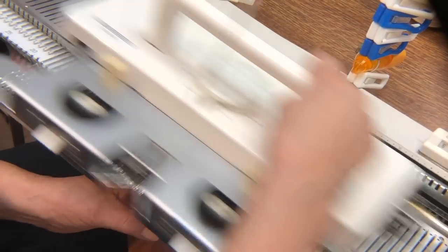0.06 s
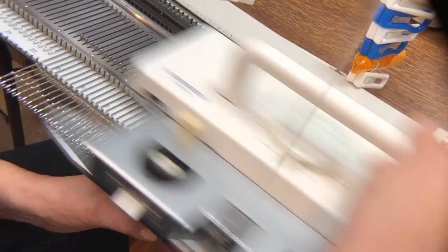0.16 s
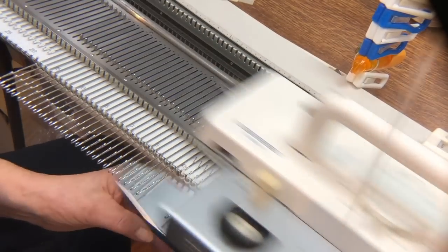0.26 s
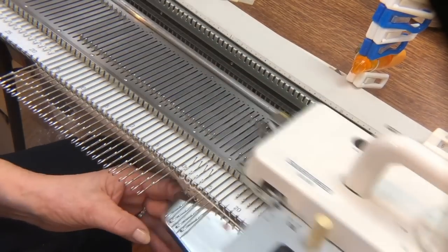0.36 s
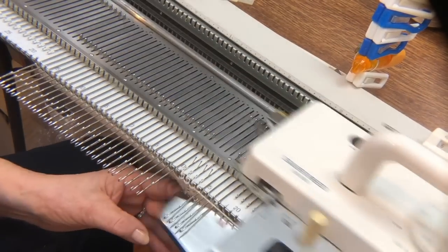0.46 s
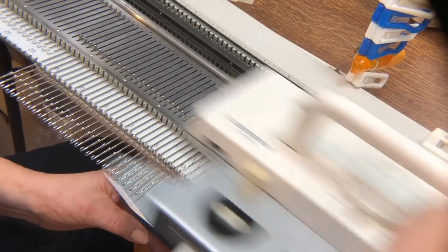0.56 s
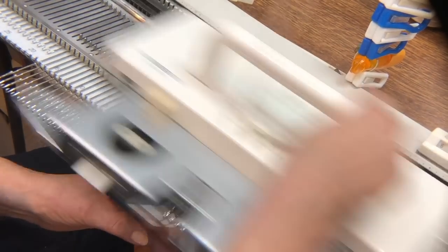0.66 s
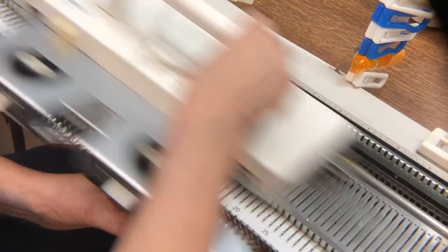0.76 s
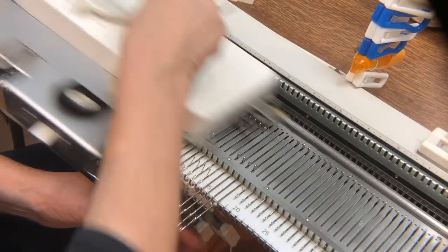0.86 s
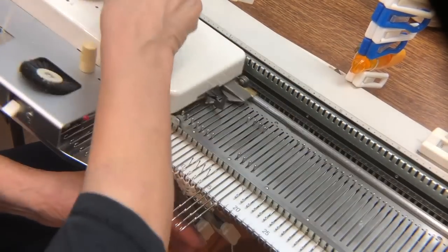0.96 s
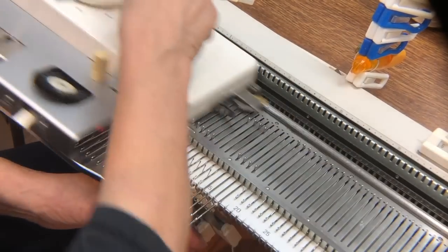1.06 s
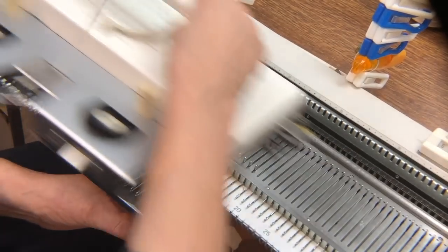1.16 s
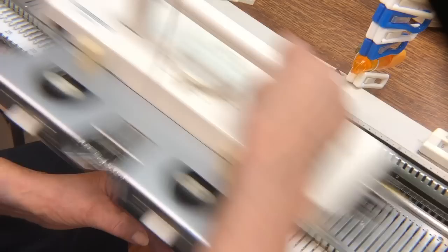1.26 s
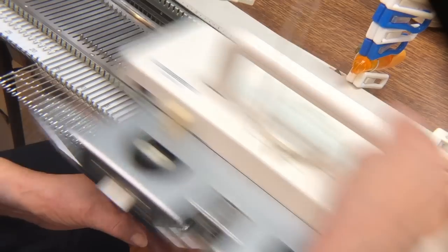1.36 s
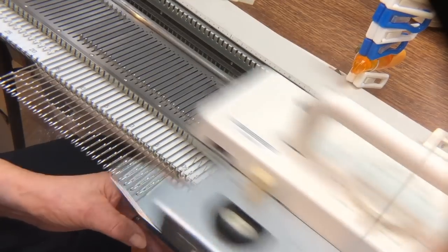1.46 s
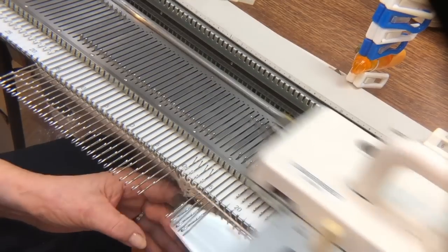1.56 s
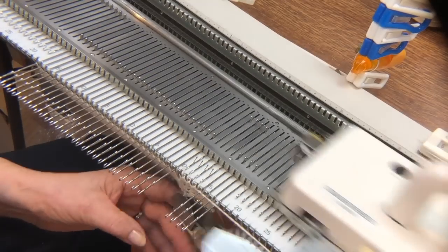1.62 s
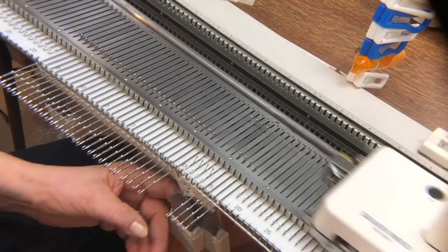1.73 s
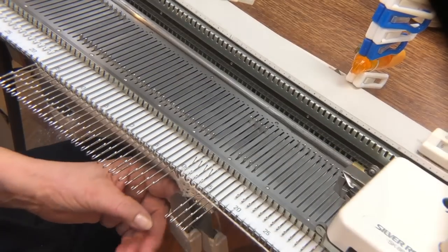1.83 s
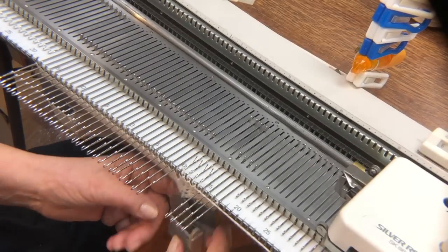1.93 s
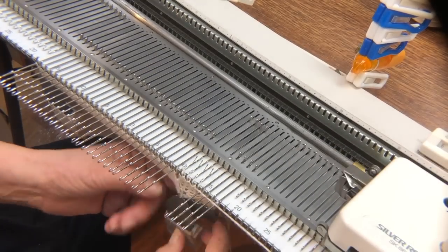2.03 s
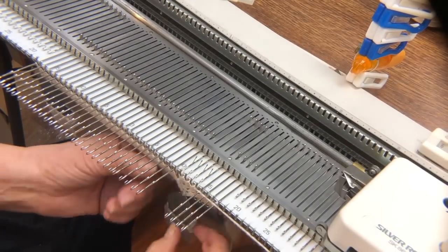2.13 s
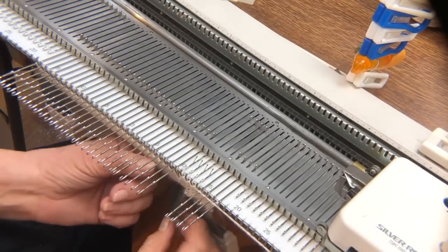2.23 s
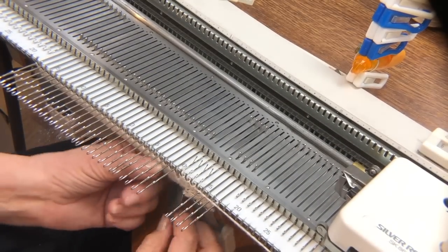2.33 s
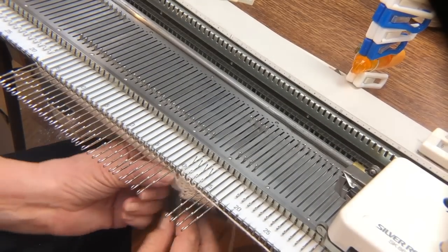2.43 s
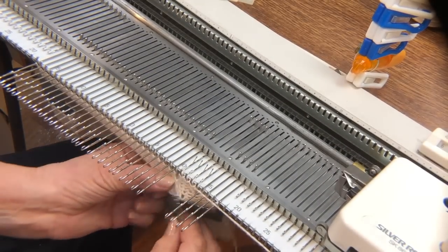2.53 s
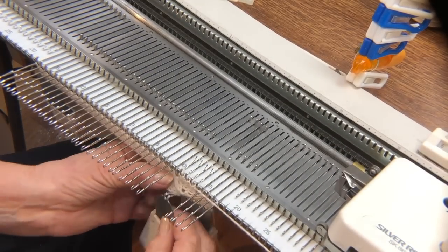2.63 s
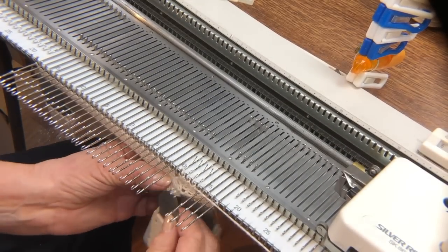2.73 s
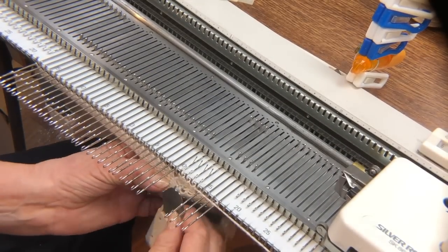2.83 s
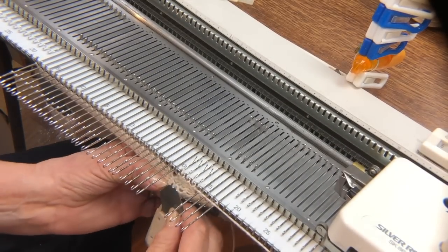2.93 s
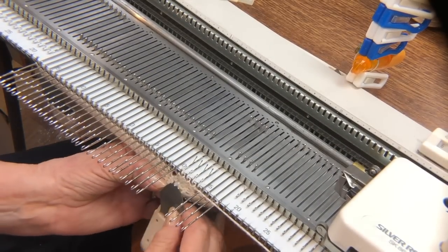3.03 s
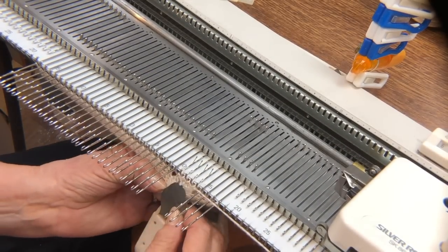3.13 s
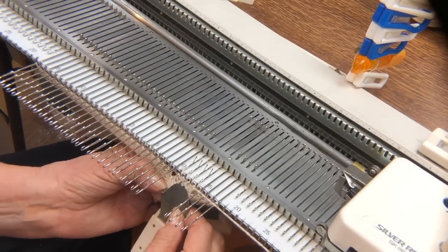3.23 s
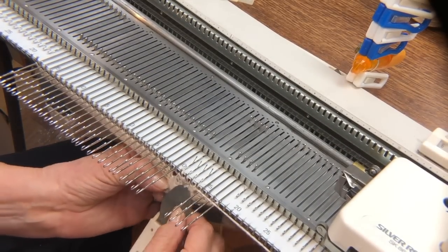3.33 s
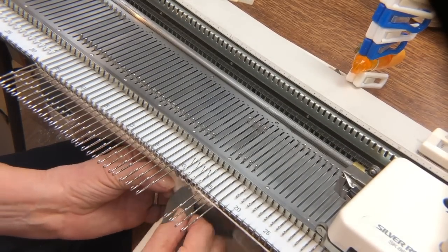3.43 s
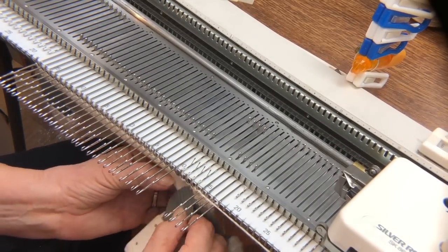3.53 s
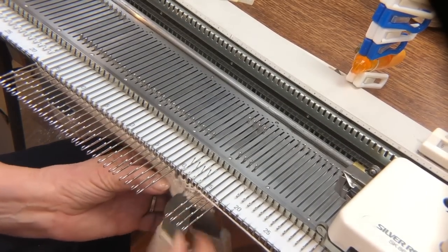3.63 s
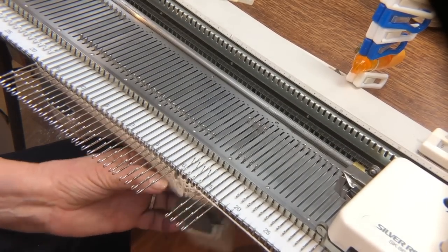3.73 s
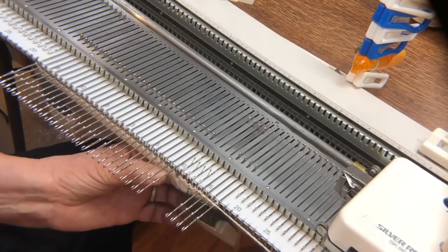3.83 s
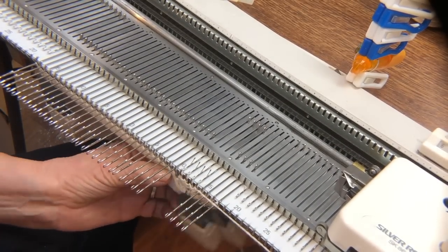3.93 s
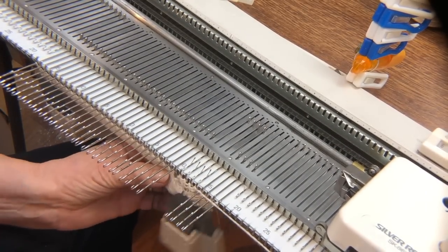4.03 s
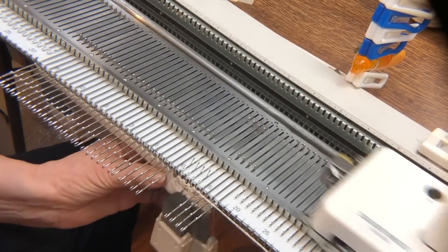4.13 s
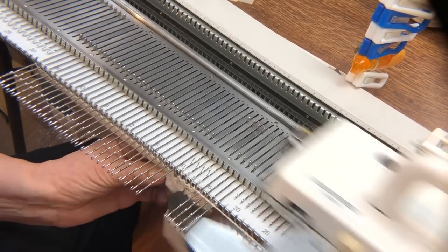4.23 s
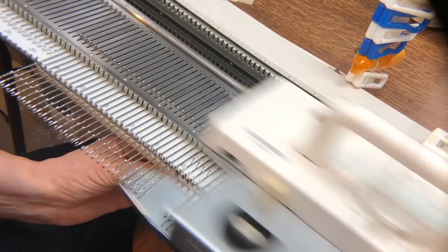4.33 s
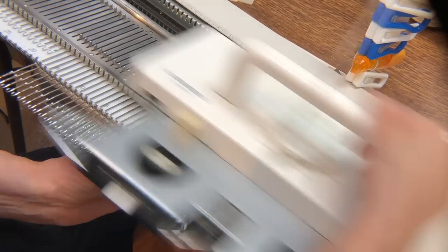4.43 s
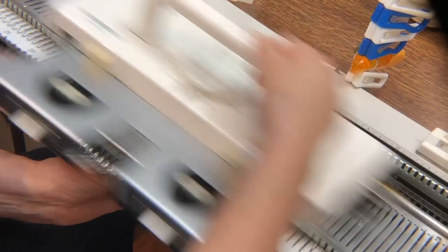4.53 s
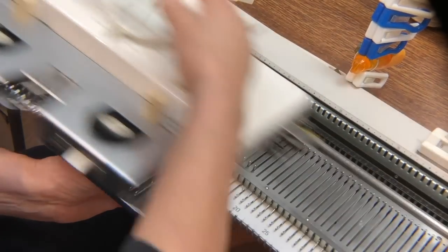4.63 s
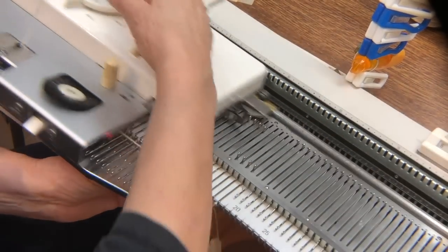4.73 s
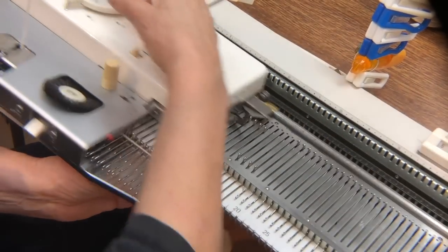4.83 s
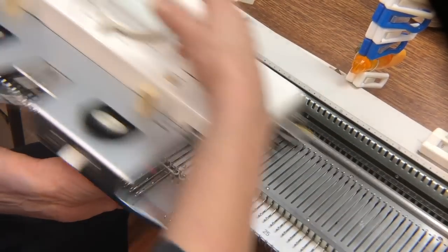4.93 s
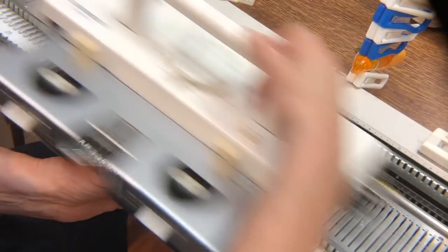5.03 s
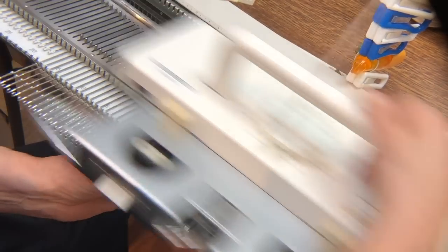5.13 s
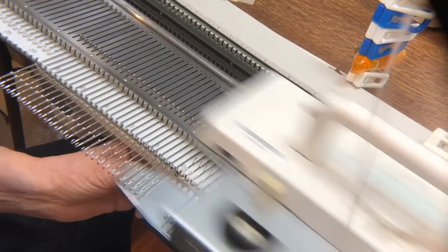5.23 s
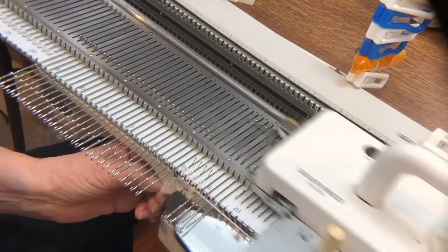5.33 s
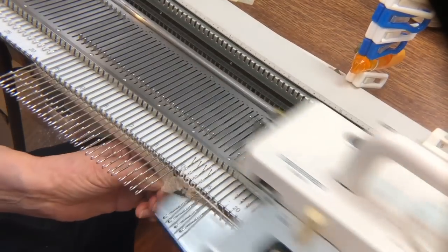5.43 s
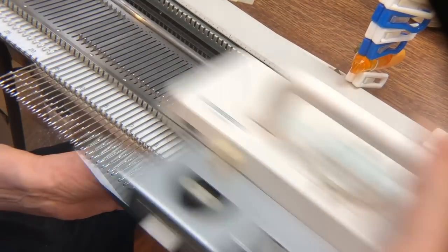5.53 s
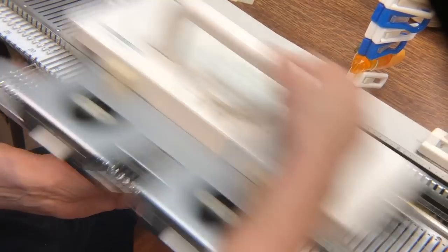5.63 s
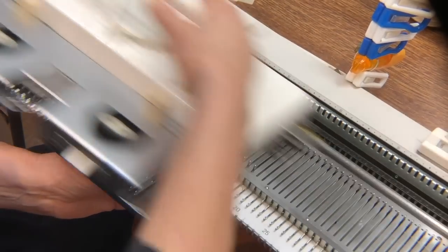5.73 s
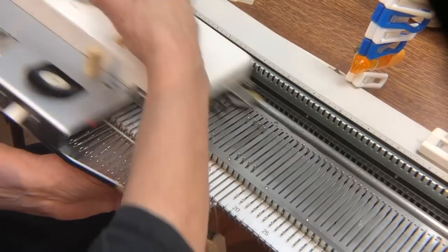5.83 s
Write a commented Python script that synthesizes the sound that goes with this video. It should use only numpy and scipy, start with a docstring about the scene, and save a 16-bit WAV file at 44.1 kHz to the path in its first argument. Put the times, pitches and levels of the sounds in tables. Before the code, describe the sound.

A hand knitting machine heard by one close microphone, centred, with short room reflections. Bright needle clatter over low rail rumble swells and fades with each push, snapping and clacking as cams enter or leave the working needles. After three strokes comes a quiet pause with faint fabric rubs, a dull knock, tiny ticks and ringing steel, then three further strokes.

```python
"""Knitting machine carriage and claw weight

A carriage is pushed over the needle bed, three rows, a pause, then three more, in a small room. Struck
needle butts rattle as grain-driven noise; rail and table rumble through resonances; sprung cams snap as
short rings. In the pause, hands rehang a steel claw weight: rubbing grains, noise ticks, rasping yarn and
a beating cluster of plate modes. One close microphone feeds both channels."""
import sys
import numpy as np
from scipy import signal
from scipy.fft import rfft, irfft
from scipy.io import wavfile

SR = 44100
rng = np.random.default_rng(int(sys.argv[2]) if len(sys.argv) > 2 else 0)


def digitize_waveform(pressure):
    """Quantize a signal to 16-bit integers and store it at the path in sys.argv[1].

    Rows of a 2-D input are taken as channels; values are limited to [-1, 1].
    """
    field = np.atleast_2d(pressure).T
    bounded = np.clip(field, -1, 1)
    quanta = np.round(bounded * 32767).astype(np.int16)
    wavfile.write(sys.argv[1], SR, quanta)


N = 258796
TIME = np.arange(N) / SR

# spectrum of the struck needles: pitch_hz [Hz], level_db [dB per Hz, relative]
NEEDLE_SPECTRUM = [(700, -35.5), (1400, -7.5), (1800, -2), (2550, -9), (2800, -7), (4400, -7), (5600, -1.5),
                   (7300, -1), (9300, -2), (11400, -4.5), (12700, -8), (14000, -2.5), (15800, -7.5)]
# resonances of the needles: centre_hz [Hz], width_hz [Hz], lift_db [dB]
NEEDLE_RESONANCES = [(1686, 96, 0), (2290, 380, 3.5), (2427, 150, 8), (6280, 670, 5), (6380, 550, 2),
                     (7870, 500, 4), (8980, 130, 4), (11190, 480, 3.5)]
# resonances of the needle bed: centre_hz [Hz], width_hz [Hz], lift_db [dB]
BED_RESONANCES = [(141.6, 14, 8.9), (300.9, 23, 11.4), (649, 30, 6.5), (1010, 11, 4.7), (1080, 44, 1.8)]


def undb(db):
    """Decibels to gain."""
    return 10 ** (np.asarray(db) / 20)


def unit(x):
    """Scale to rms 1."""
    return x / np.sqrt(np.mean(x ** 2))


def colour(x, points, peaks=(), size=8192):
    """Causal minimum-phase filter: a smooth spectrum with resonances on top."""
    f = np.maximum(np.arange(size // 2 + 1) * SR / size, 1)
    hz, db = np.transpose(points)
    shape = np.interp(np.log(f), np.log(hz), db)
    for centre, width, lift in peaks:
        shape = shape + lift / (1 + (2 * (f - centre) / width) ** 2)
    # folding the cepstrum forward in time makes the filter causal
    cepstrum = irfft(np.log(undb(shape)))
    cepstrum[1:size // 2] *= 2
    cepstrum[size // 2 + 1:] = 0
    impulse = irfft(np.exp(rfft(cepstrum)))
    return signal.fftconvolve(x, impulse)[:len(x)]


def lowpass(x, hz):
    """Gentle low-pass without delay."""
    sos = signal.butter(1, min(hz, .45 * SR), fs=SR, output="sos")
    return signal.sosfiltfilt(sos, x)


def fade(t60):
    """Half a second of exponential decay, falling 60 dB in t60 seconds."""
    return undb(-60 * TIME[:SR // 2] / t60)


def burst(t60):
    """A dense cloud of modes dying away, made of decaying noise."""
    return rng.standard_normal(SR // 2) * fade(t60)


def ring(hz, t60):
    """One decaying mode."""
    return np.sin(2 * np.pi * hz * TIME[:SR // 2]) * fade(t60)


def add(out, s, x, db):
    """Mix in a hit that starts at time s, scaled to the given peak level."""
    i = max(int(s * SR), 0)
    hit = x * undb(db) / np.abs(x).max()
    out[i:i + len(x)] += hit[:N - i]


def grains(rate, spread_db):
    """Tiny impacts of uneven size, rate a second, at even mean power."""
    chance = np.clip(rate / SR, 1e-3, 1)
    signs = rng.choice([-1, 1], N)
    sizes = signs * undb(spread_db * np.clip(rng.standard_normal(N), -2, 2))
    return unit((rng.random(N) < chance) * sizes / np.sqrt(chance))


def clatter(rate, spread_db, t60):
    """Tiny impacts, each exciting its own brief cloud of modes."""
    energy_decay = undb(-120 / (t60 * SR))
    energy = signal.lfilter([1], [1, -energy_decay], grains(rate, spread_db) ** 2)
    return unit(np.sqrt(energy) * rng.standard_normal(N))


def flutter(rate, depth_db):
    """A gain that wanders at random, with a new target rate times a second."""
    knots = rng.standard_normal(N // 20)
    return undb(depth_db * np.interp(TIME * rate, np.arange(len(knots)), knots))


def swell(s, rise_s, fall_s, shape=2):
    """A bell of height 1 at time s, with its own rise and fall times."""
    return np.exp(-np.abs((TIME - s) / np.where(TIME < s, rise_s, fall_s)) ** shape)


def lifts(rows, width_s):
    """A gain of 1 with a brief rise at each (s, dB)."""
    return undb(sum(db * swell(s, width_s, width_s) for s, db in rows))


def reverb(x, t60, wet_db):
    """Direct sound plus a diffuse tail, with the response held at unit energy."""
    tail = burst(t60)
    response = undb(wet_db) * tail / np.linalg.norm(tail)
    response[0] += 1
    # the lowest notes are left to the resonances of the machine
    bass = lowpass(x, 500)
    return bass + signal.fftconvolve(x - bass, response / np.linalg.norm(response))[:len(x)]


def room_tone():
    """The quiet room: steady coloured noise, with a faint thin whine."""
    # room noise spectrum: pitch_hz [Hz], level_db [dB per Hz, relative]
    room_spectrum = [(24, -31), (40, -1), (80, 1), (309, -2.5), (838, -12.5), (1250, -16.5), (1960, -17),
                     (2840, -22.5), (5580, -24), (6640, -15), (8110, -25), (14400, -29.5), (15500, -37)]
    hiss = colour(rng.standard_normal(N), room_spectrum, [(6530, 700, -1), (8950, 200, 8.0)])
    return unit(hiss) * undb(-72.5)


def push_strength():
    """Each push gathers speed and slows, the next takes over at the turn; also the rightward share, 0-1."""
    # pushes, right and left in turn: fastest_s [s], level_db [dB], speeding_up_s [s], slowing_down_s [s]
    push_rows = [(0.155, -24.5, .195, 0.27), (0.822, -21.5, 0.18, 0.15), (1.355, -23, 0.14, 0.34),
                 (4.645, -23.5, 0.32, 0.15), (5.164, -22.5, .15, 0.22), (5.76, -19.5, 0.16, 0.13)]
    push_shape = 2.17  # 2 is a plain bell; higher holds the speed longer and brakes harder
    park_s, restart_s, stopping_s = 1.87, 4.16, .04
    bells = np.array([undb(db) * swell(s, rise_s, fall_s, push_shape)
                      for s, db, rise_s, fall_s in push_rows])
    parked = (TIME > park_s) & (TIME < restart_s)
    moving = np.where(parked, swell(park_s, stopping_s, stopping_s), 1)
    # the carriage never slides quite evenly
    push = np.linalg.norm(bells, axis=0) * moving * flutter(22.04, depth_db=1.24)
    right = bells[::2].sum(axis=0) / (bells.sum(axis=0) + 1e-30)
    return push, right


def cam_load(lag_s):
    """1 while a cam is among the working needles: it bites at once and lets go gradually."""
    # the leading cam among the working needles: enter_s [s], leave_s [s]
    engaged_spans = [(-0.1, 0.32), (0.657, 1.497), (4.448, 5.295), (5.602, 5.975)]
    settle_s = 0.057  # the needles calm down after the cams have left
    t = TIME - lag_s
    loads = [(t >= enter) * np.exp(-np.maximum(t - leave, 0) / settle_s)
             for enter, leave in engaged_spans]
    return np.max(loads, axis=0)


def needles(drive, force):
    """Needle butts strike the cams: force makes the blows denser and brighter, drive sets their level."""
    blows = clatter(1100 + 2600 * force, spread_db=3.2, t60=.012)
    bright = unit(colour(blows, NEEDLE_SPECTRUM, NEEDLE_RESONANCES))
    # running clear of the working needles, the rattle is duller, fuller near 2 kHz
    soft_tilt = [(1200, -1.0), (2300, 4.5), (3000, 3.0), (7000, 0.5), (11000, -6.5), (13000, -12), (16000, -13)]
    soft = colour(bright, soft_tilt, [(6300, 600, -0.5), (7900, 700, 0)])
    rattle = force * bright + (1 - force) * soft * undb(0.5)
    return reverb(rattle * drive, t60=0.07, wet_db=-6) * undb(0.72)


def bed(grinding, rumble):
    """The carriage grinds along its rail and shakes the steel bed and the table under it."""
    # rail grinding spectrum: pitch_hz [Hz], level_db [dB per Hz, relative]
    rail_spectrum = [(100, -41.5), (260, -26), (420, -2.5), (560, 4), (800, 1), (1250, 1), (1700, -9.5),
                     (3000, -22), (8000, -49.5)]
    # table rumble spectrum: pitch_hz [Hz], level_db [dB per Hz, relative]
    table_spectrum = [(20, -51), (32, -31), (48, -17.5), (100, -5), (135, 0), (190, 3), (240, -5),
                      (340, -1), (450, -9), (900, -36.5)]
    scuffing = reverb(clatter(1200, spread_db=0.5, t60=0.029), t60=0.16, wet_db=-2.0)
    rail = unit(colour(scuffing, rail_spectrum, BED_RESONANCES))
    table = unit(colour(grains(1500, spread_db=2), table_spectrum, BED_RESONANCES))
    return rail * grinding + table * rumble


def carriage():
    """The pushes and the load on the cams drive the rattle, the grinding and the rumble."""
    # rattle surges midway through each push to the right: time_s [s], lift_db [dB]
    surge_rows = [(0.155, 3.5), (1.39, 3.5), (5.165, 2)]
    # resistance makes the carriage grind harder on its rail: time_s [s], lift_db [dB]
    drag_rows = [(0.105, 3.5), (0.364, 14.5), (0.716, 9.5), (1.345, 4), (1.574, 11), (4.505, 5),
                 (5.334, 11.5), (5.66, 6.5), (5.785, 0.5)]
    push, right = push_strength()
    # the trailing cam follows the leading one, which takes most of the load
    cam_gap_s, lead_share = .038, 0.87
    load = lead_share * cam_load(0) + (1 - lead_share) * cam_load(cam_gap_s)
    free = np.clip(1 - load, 0, 1)  # 1 when running clear of the working needles
    surge = lifts(surge_rows, width_s=.035)
    drive = push * undb(-13 * free) * surge
    # the hardest blows come at a push of -23 dB; a small share is left when running clear
    force = np.clip(push / undb(-23), 0, 1) ** 0.097 * 0.07 ** free
    # pushed to the right, the carriage shakes the machine more
    grind_db = -19.5 - 4 * free + 0.5 * right
    rumble_db = -36.5 - 5 * free + 2 * right
    # the exponents are dB per dB of push: the rumble grows more slowly with speed
    grinding = push ** .84 * undb(grind_db) * lifts(drag_rows, width_s=.019)
    rumble = push ** 0.47 * undb(rumble_db) * surge * flutter(13, depth_db=3.0)
    return needles(drive, force) + bed(grinding, rumble)


def snaps():
    """Each sprung cam snaps over with a ring of a few milliseconds and a short noise burst."""
    # cams snapping over: time_s [s], level_db [peak dB before reverb and trim], ring_hz [Hz]
    snap_rows = [(0.3136, -17, 6620), (0.3534, -9.5, 6500), (0.661, -14, 6600), (0.6975, -11, 6120),
                 (1.5224, -10.5, 6430), (1.5619, -11.5, 6720), (4.4508, -10, 6650), (4.4867, -12, 6100),
                 (5.2896, -15, 6600), (5.3233, -8.5, 6580), (5.6051, -5, 6720), (5.635, -9, 6080)]
    out = np.zeros(N)
    for s, db, hz in snap_rows:
        ping = ring(hz, t60=0.019) * (1 - fade(0.0017))
        add(out, s - .0007, ping + undb(-15.5) * burst(0.0058), db)
    return reverb(out, t60=0.26, wet_db=-3.0) * undb(-4.0)


def clacks():
    """The carriage jolts the rail and the whole row of needles answers."""
    # play taken up on the rail: time_s [s], level_db [peak dB before low-pass and trim]
    clack_rows = [(0.354, -7.5), (0.559, -38), (0.6583, -11), (1.1348, -28), (1.5617, -6.5), (4.146, -44),
                  (4.1634, -52), (4.292, -26), (4.3723, -17), (4.4479, -12.5), (4.9495, -20.5),
                  (5.3226, -10.5), (5.503, -34), (5.5995, -9)]
    out = np.zeros(N)
    for s, db in clack_rows:
        jolt = burst(0.0033) + undb(-10.0) * burst(0.22)
        add(out, s, colour(jolt, NEEDLE_SPECTRUM, NEEDLE_RESONANCES), db)
    return lowpass(out, hz=12300) * undb(-2.0)


def knocks():
    """Dull blows ring the bed, each spot with its own pitch; the loose needles shiver on after them."""
    # blows on the bed: time_s [s], level_db [peak dB before trim], bass_boost_db [dB], pitch_hz [Hz]
    knock_rows = [(0.359, -22.5, -1.5, 880), (0.698, -22.5, -15, 1300), (0.712, -39, -10, 750),
                  (1.567, -25.5, -6, 708), (2.535, -26, 6.5, 1240), (3.435, -45.5, -7, 1032),
                  (3.894, -35.5, 8.5, 1400), (3.922, -38, 31, 880), (4.057, -40, 5, 920),
                  (4.163, -34.5, -16, 1800), (4.489, -24, -16, 740), (5.329, -19, -14, 840)]
    # spectrum of a blow: pitch_hz [Hz], level_db [dB per Hz, relative]
    knock_spectrum = [(40, -43), (100, -19.5), (190, -6), (400, -6), (630, 1), (1000, -3.5), (1400, -4.5),
                      (1900, -7), (2450, -10.5), (3400, -21.5), (6500, -21.5), (15000, -40)]
    # the steel bed's resonances under a blow: centre_hz [Hz], width_hz [Hz], lift_db [dB]
    knock_resonances = [(280, 25, -0.5), (606, 69, 2.5), (863, 20, 3), (1120, 43, -4)]
    out = np.zeros(N)
    for s, db, bass_db, hz in knock_rows:
        blow = burst(0.039) + undb(-3.0) * burst(0.34)
        blow = blow + (undb(bass_db) - 1) * lowpass(blow, hz=400)
        shiver = undb(-31.0) * colour(burst(0.42), NEEDLE_SPECTRUM, NEEDLE_RESONANCES)
        spot = (hz, 0.48 * hz, 7)
        add(out, s, colour(blow, knock_spectrum, knock_resonances + [spot]) + shiver, db)
    return out * undb(-3.5)


def latches():
    """Needle latches flick, and the claw ticks once: small dry ticks with a trace of room."""
    # needle latch flicks, and a claw tick at 3.952 s: time_s [s], level_db [peak dB], pitch_hz [Hz]
    latch_rows = [(0.558, -33, 5030), (1.996, -47.5, 2180), (2.118, -60.5, 2400), (2.147, -55.5, 3600),
                  (2.290, -62, 6570), (2.361, -53.5, 1710), (2.464, -58, 2090), (3.014, -64.5, 2005),
                  (3.952, -42.5, 4320), (4.149, -35, 4800), (5.504, -30, 4850), (5.552, -41, 8000),
                  (5.594, -37, 5530)]
    out = np.zeros(N)
    for s, db, hz in latch_rows:
        tick = burst(0.06) + undb(-11.5) * burst(0.33)
        tick_spectrum = [(hz / 5, -14), (hz, 0), (hz * 0.97, -5), (hz * 5, -20)]
        add(out, s, colour(tick, tick_spectrum), db)
    return out


def bumps():
    """Fingers bump the hanging fabric; soft pushes reach only the lowest resonances of the bed."""
    # finger bumps: time_s [s], level_db [peak dB]
    bump_rows = [(1.72, -45), (1.82, -60), (2.078, -57.5), (2.139, -57), (2.257, -56.5), (2.739, -61),
                 (3.015, -65.5), (3.074, -64.5), (3.187, -64.5), (3.465, -66), (3.734, -49), (4.11, -48),
                 (4.135, -48)]
    bump_spectrum = [(40, -18), (150, -5), (300, -20.5), (700, -16.0), (2500, -48)]
    out = np.zeros(N)
    for s, db in bump_rows:
        add(out, s, colour(burst(0.11), bump_spectrum, BED_RESONANCES), db)
    return out


def hands():
    """Fingers rub and tug the knitting; the yarn drags on the hooks and keeps the claw faintly ringing."""
    # tugs at the knitting, and the low body of the claw clink at 3.79 s:
    # time_s [s], dying_away_s [s], fabric_rub_db [dB], hook_scrape_db [dB]
    tug_rows = [(1.78, 0.14, -53.5, -61), (1.89, 0.045, -59, -76.5), (2.005, 0.046, -65, -71),
                (2.13, 0.047, -70, -82.5), (2.295, 0.086, -70, -73.5), (2.44, .08, -68, -79),
                (2.575, 0.11, -63, -67), (3.125, .25, -88, -81.5), (3.265, .04, -76.5, -83),
                (3.435, 0.22, -70, -67.5), (3.575, 0.014, -89, -84), (3.68, 0.032, -82, -73),
                (3.79, 0.099, -61.5, -78), (3.98, .025, -59, -72), (4.075, 0.064, -58.5, -65.5)]
    # fabric rubbing spectrum: pitch_hz [Hz], level_db [dB per Hz, relative]
    rub_spectrum = [(20, -38), (40, -27), (80, -4), (145, 2), (230, -8.5), (400, -3), (800, -7),
                    (1100, -10.5), (1700, -11.5), (2500, -19), (5000, -33)]
    # hook scraping spectrum: pitch_hz [Hz], level_db [dB per Hz, relative]
    hook_spectrum = [(1500, -9), (2500, -9), (3700, -2.5), (5400, -4), (6500, 2), (8200, -7), (11400, -10),
                     (12500, -16.5), (13800, -10.5), (15500, -16)]
    rub = unit(colour(grains(900, spread_db=3.0) * flutter(35, depth_db=3.0), rub_spectrum))
    scraping = clatter(330, spread_db=3.5, t60=0.047)
    hooks = unit(colour(scraping, hook_spectrum, [(6490, 400, 5), (8800, 200, 11)]))
    out = np.zeros(N)
    for s, fall_s, rub_db, hook_db in tug_rows:
        out += swell(s, 0.028, fall_s) * (rub * undb(rub_db) + hooks * undb(hook_db))
    return out


def scrapes():
    """Taut yarn drags over the gate pegs: its rough, narrow rasp rises in pitch as it tightens."""
    # yarn scrapes: start_s [s], end_s [s], level_db [dB], start_hz [Hz], end_hz [Hz]
    scrape_rows = [(2.204, 2.358, -68, 640, 842), (2.358, 2.482, -75, 1000, 1245),
                   (3.415, 3.465, -66, 1000, 1050), (4.18, 4.351, -61, 750, 896),
                   (4.344, 4.476, -48, 850, 1000)]
    out = np.zeros(N)
    for start, end, db, start_hz, end_hz in scrape_rows:
        progress = np.clip((TIME - start) / (end - start), 0, 1)
        pitch = start_hz + (end_hz - start_hz) * progress
        phase = 2 * np.pi * np.cumsum(pitch) / SR
        # slow noise on a sine carrier makes a narrow band of noise
        rasp = unit(lowpass(rng.standard_normal(N), hz=132) * np.sin(phase))
        out += rasp * np.sqrt(np.abs(np.sin(np.pi * progress))) * undb(db)
    return out


def claw_ring(count=4):
    """Each mode of the loosely held plate is a tight cluster that beats unevenly."""
    # modes of the claw weight: pitch_hz [Hz], level_db [dB, relative], t60_s [s]
    claw_modes = [(3600, -15, 0.12), (5000, -0.5, 0.11), (4960, 2, 0.13), (6200, -13, 0.13),
                  (7760, -8, 0.17), (7650, 0, 0.22), (9040, 0, 0.18), (9200, -23, .15), (11460, -18, 0.11),
                  (13090, -23, .15), (14300, -20, .18)]
    out = 0
    for hz, db, t60 in claw_modes:
        for detune, size in rng.standard_normal((count, 2)):
            out = out + undb(db) * size * ring(hz * (1 + 0.00296 * detune), t60)
    return out / np.sqrt(count)


def clinks():
    """The claw weight ticks on the needles and its steel plate rings on."""
    # claw touches: time_s [s], level_db [peak dB before reverb and trim], ring_db [dB, relative]
    clink_rows = [(2.464, -45.5, -19), (3.466, -53, -1), (3.564, -56, -7), (3.702, -34, -14),
                  (3.725, -39, -14), (3.786, -32, 3), (3.790, -22, -14), (3.815, -28, -2),
                  (3.888, -37.5, -4), (3.951, -40, 2.5)]
    tick_spectrum = [(100, -48), (600, -4.0), (2500, -5.0), (5000, 3.5), (9000, 4.5), (15000, -4.0)]
    out = np.zeros(N)
    for s, db, ring_db in clink_rows:
        contact = burst(.018) + undb(-22) * burst(.25)
        tick = colour(contact, tick_spectrum)
        add(out, s, tick + undb(ring_db - 8) * claw_ring(), db)
    return reverb(out, t60=0.3, wet_db=-7.0) * undb(-2.0)


def scene():
    """All sources at one microphone, the same in both channels."""
    machine = carriage() + snaps() + clacks() + knocks()
    handwork = latches() + bumps() + hands() + scrapes() + clinks()
    mono = room_tone() + machine + handwork
    return np.array([mono, mono])


def record(dry):
    """The small microphone loses the deepest bass and the recorder cuts the top."""
    bass_cut = signal.butter(2, 42, "highpass", fs=SR, output="sos")
    top_cut = signal.ellip(12, .1, 80, 15750, fs=SR, output="sos")
    thin = signal.sosfilt(bass_cut, dry)
    return signal.sosfilt(top_cut, thin)


dry = scene()
out = record(dry)
digitize_waveform(out)
```